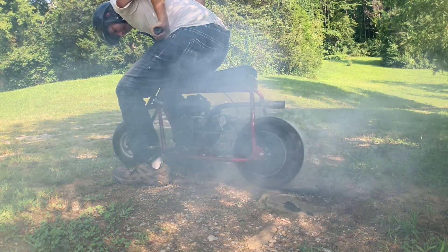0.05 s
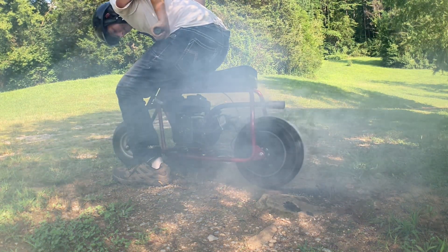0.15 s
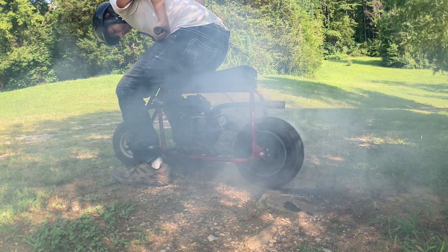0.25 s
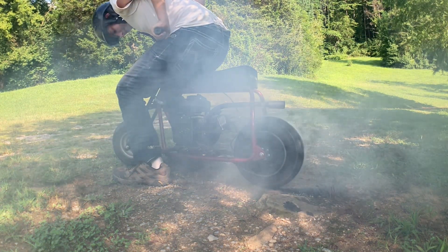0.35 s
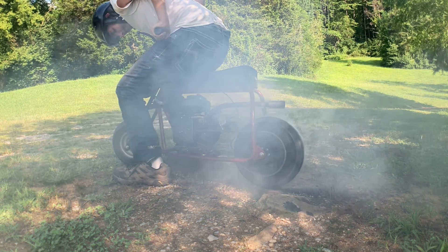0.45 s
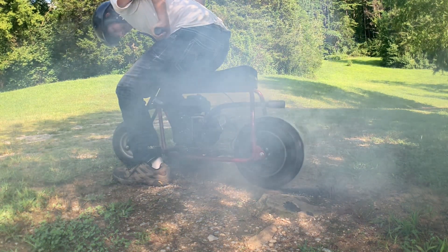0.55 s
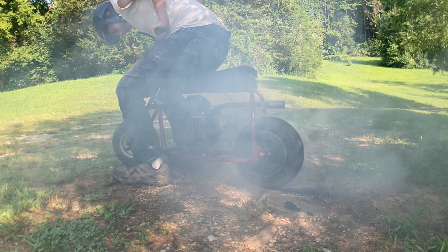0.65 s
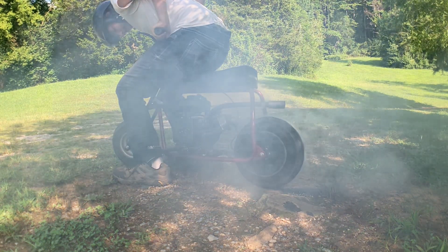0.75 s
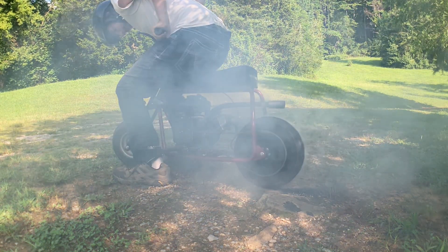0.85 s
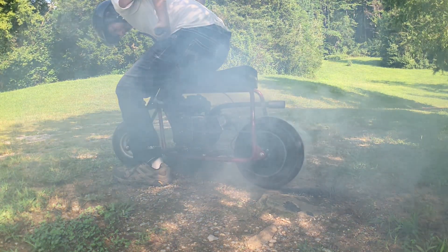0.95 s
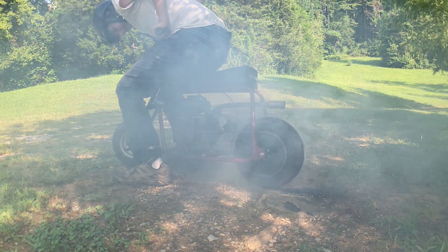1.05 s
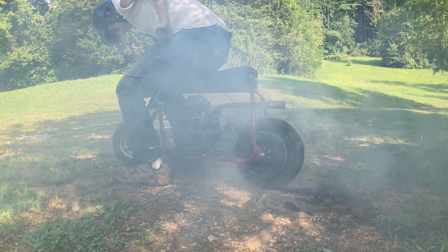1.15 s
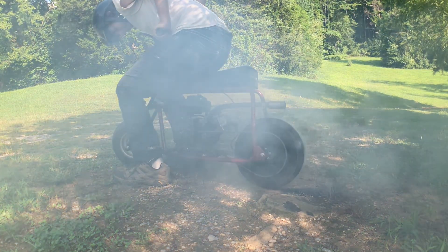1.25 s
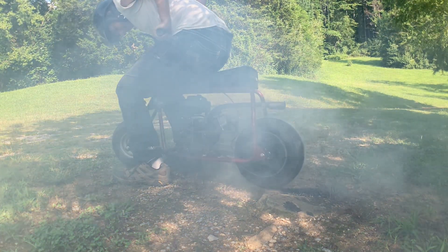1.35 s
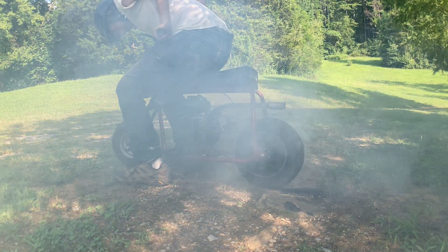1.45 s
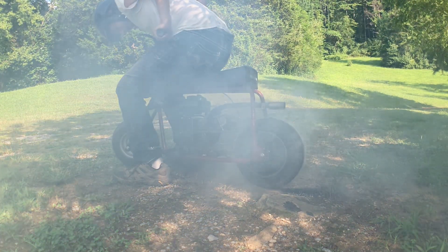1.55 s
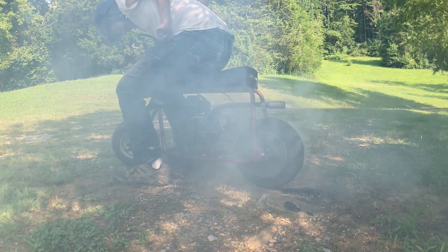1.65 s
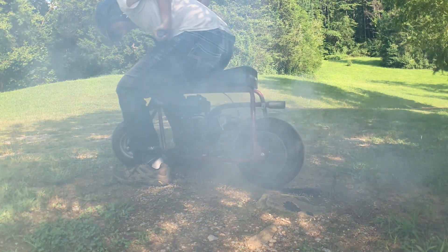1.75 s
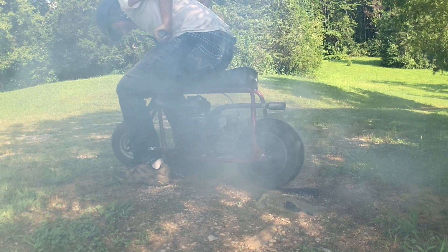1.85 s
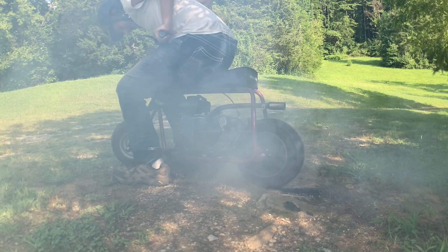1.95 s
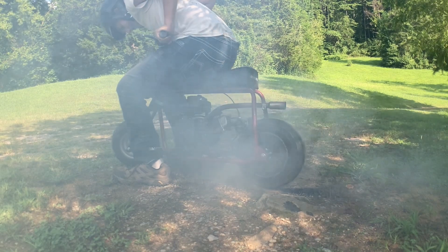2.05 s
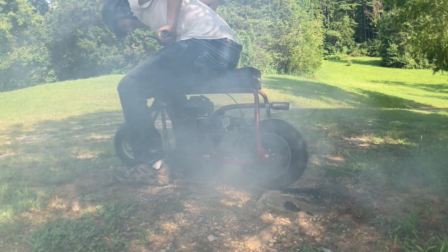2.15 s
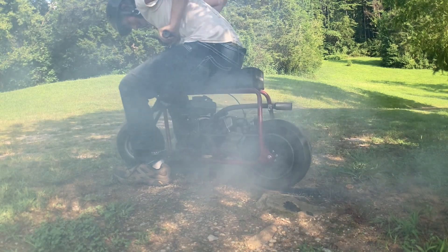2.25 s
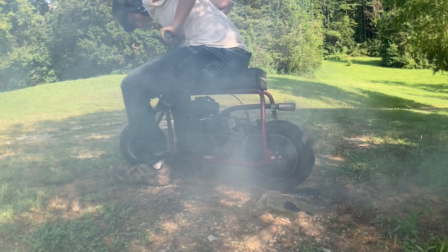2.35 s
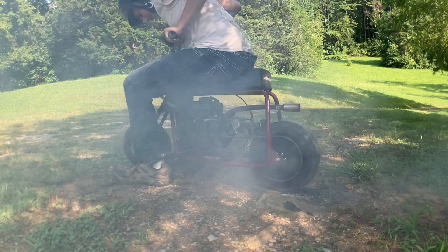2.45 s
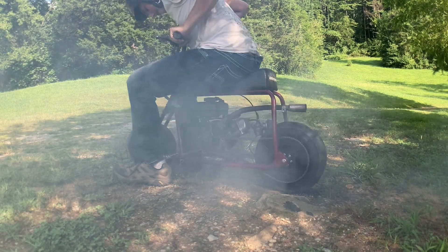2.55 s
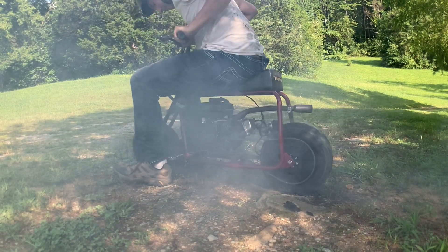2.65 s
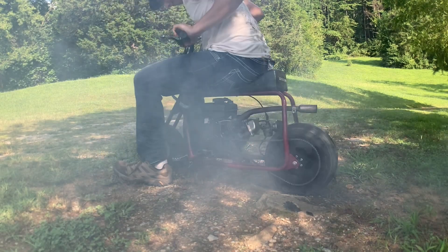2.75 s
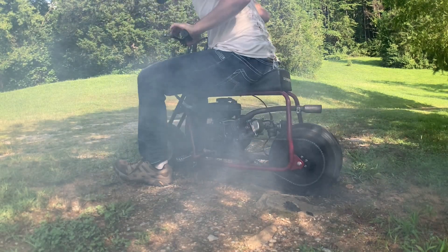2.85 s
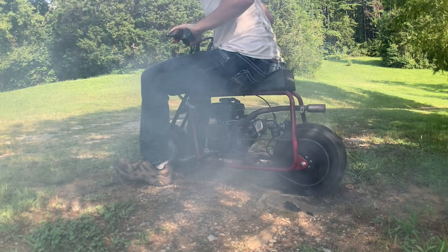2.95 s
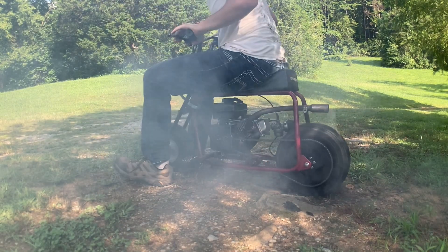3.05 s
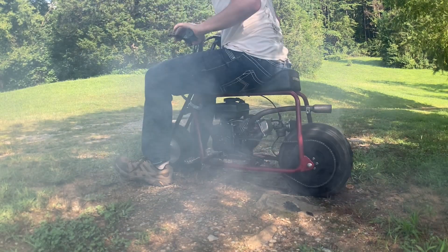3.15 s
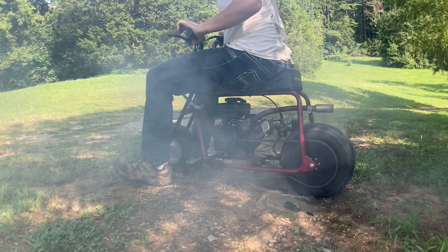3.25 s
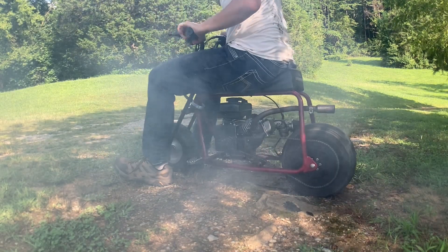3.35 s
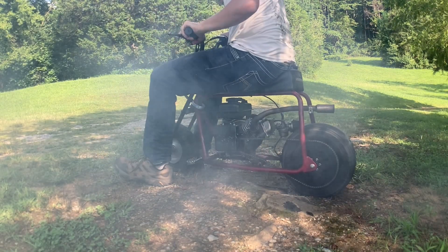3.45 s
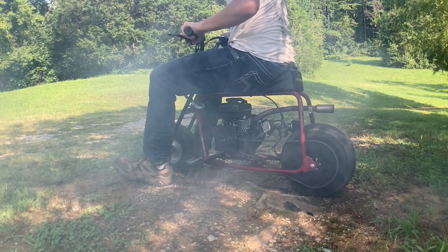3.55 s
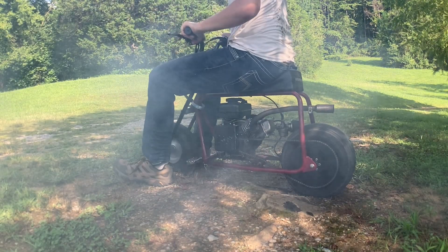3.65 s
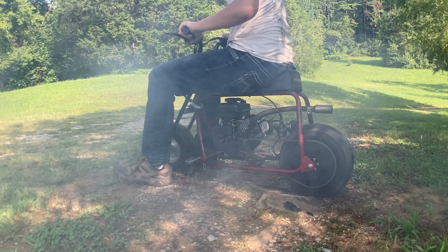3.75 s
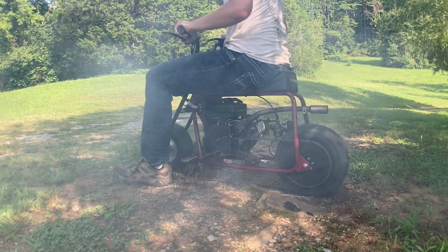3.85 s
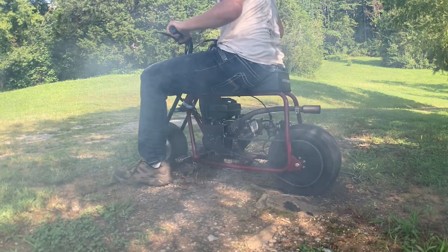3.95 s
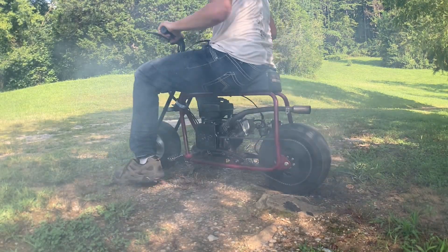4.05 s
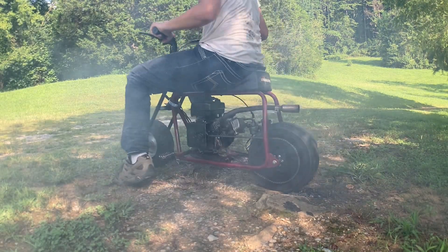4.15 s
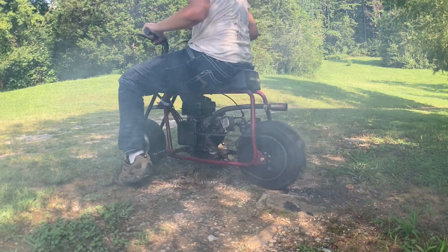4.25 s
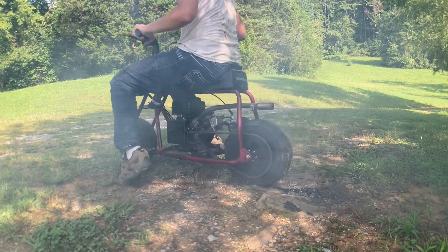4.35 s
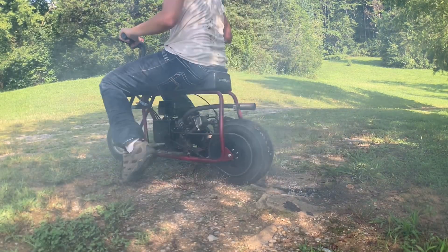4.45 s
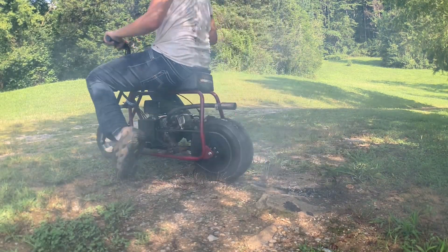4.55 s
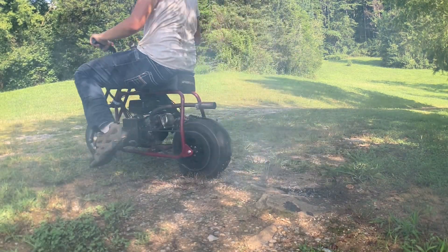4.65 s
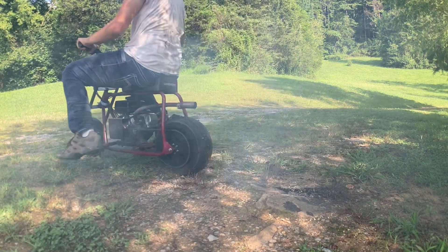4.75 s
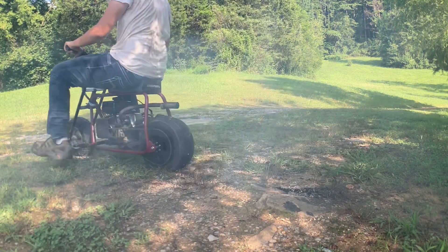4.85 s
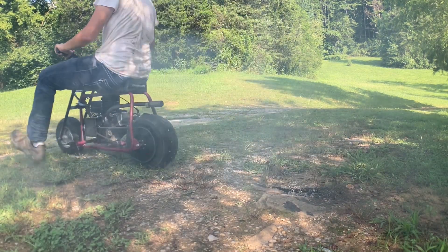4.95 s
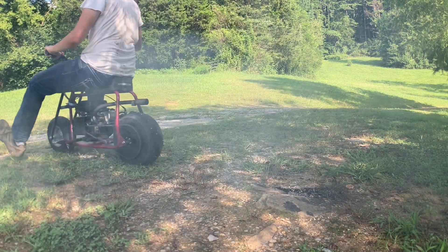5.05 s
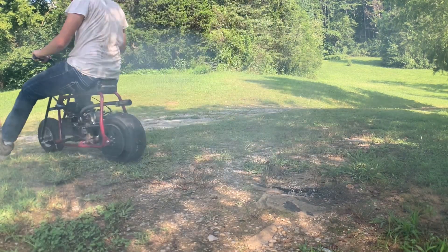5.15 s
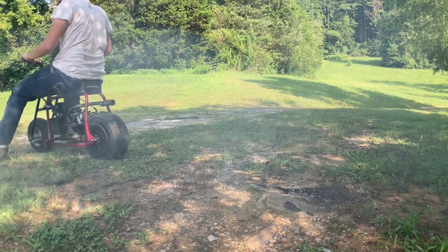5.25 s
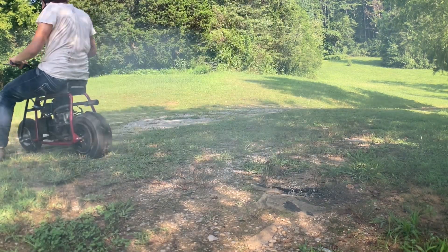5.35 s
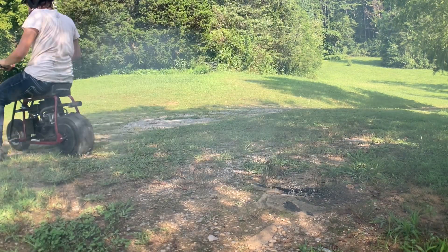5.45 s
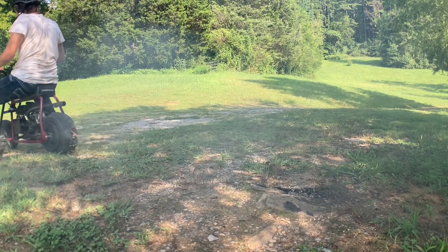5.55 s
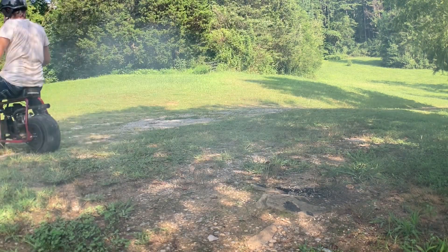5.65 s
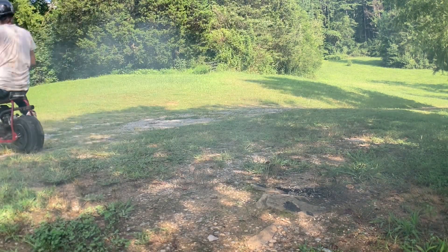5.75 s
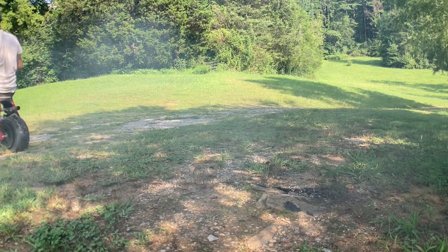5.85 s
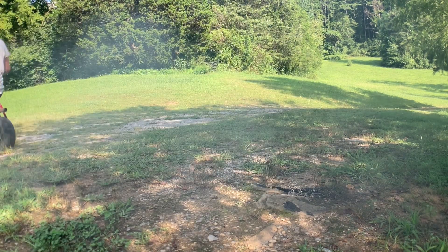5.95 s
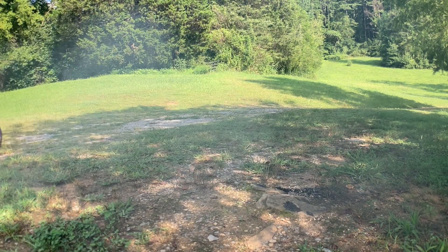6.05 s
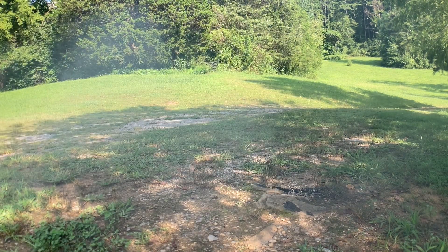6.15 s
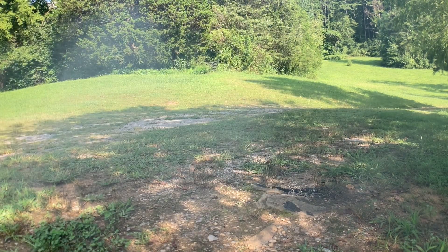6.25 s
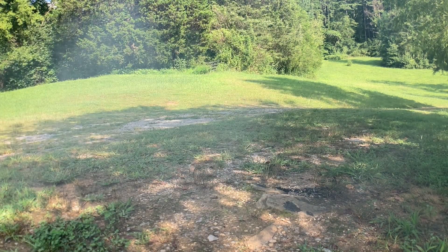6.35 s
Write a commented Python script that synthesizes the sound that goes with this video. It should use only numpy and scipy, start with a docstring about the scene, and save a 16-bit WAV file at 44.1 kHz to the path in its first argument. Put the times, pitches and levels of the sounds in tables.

```python
"""A four-stroke single on a mini bike roars flat out about 2 m from the microphone, its rear tyre spinning in dirt.
The throttle shuts, is blipped, the engine sinks to a lumpy idle and catches again with a few sharp pops.
Then it putters off across a lawn, turning its exhaust towards the listener; a wood echoes faintly.
Pulses timed by the crank ring resonances for exhaust and intake and carry bursts of gas noise; harmonics
make the full-throttle drone, and filtered noise the fan, chain, grit, pops and clutch squeal."""
import sys
import numpy as np
from scipy import signal
from scipy.fft import rfft, irfft
from scipy.io import wavfile
from scipy.ndimage import uniform_filter1d

SR = 44100
rng = np.random.default_rng(int(sys.argv[2]) if len(sys.argv) > 2 else 0)


def inscribe(sig):
    """Save sig as 16-bit PCM at rate SR to the path in sys.argv[1].

    A 1-D sig is mono; a 2-D sig holds one channel per row.
    Samples are clipped to [-1, 1] before scaling.
    """
    pcm = np.round(np.clip(np.atleast_2d(sig).T, -1, 1) * 32767)
    wavfile.write(sys.argv[1], SR, pcm.astype(np.int16))


N = 281790
TIME = np.arange(N) / SR
NEAR_M = 2.05  # distance from the microphone to the bike at its nearest


def undb(db):
    """Decibels to gain."""
    return 10 ** (np.asarray(db) / 20)


def curves(table):
    """Each column of a table of (time [s], ..) rows, sample by sample."""
    s, *columns = np.transpose(table)
    return [np.interp(TIME, s, c) for c in columns]


def unit(x):
    """Scale to rms 1."""
    return x / np.sqrt(np.mean(x ** 2) + 1e-18)


def noise():
    """White noise."""
    return rng.standard_normal(N)


def walk(rate):
    """Random levels, each held 1 / rate seconds, then slewed and scaled to rms 1."""
    hold = int(SR / rate)
    steps = noise()[np.arange(N) // hold]
    return unit(uniform_filter1d(steps, hold))


def ring(x, hz, width_hz):
    """One resonance, gain 1 at its centre."""
    return signal.lfilter(*signal.iirpeak(hz, hz / width_hz, fs=SR), x + 1e-18)


def colour(x, points, size=2048):
    """Minimum-phase filter through (frequency [Hz], level [dB]) points that keeps the power of white noise."""
    hz, db = np.transpose(points)
    bins_hz = np.arange(size // 2 + 1) * SR / size
    log_gain = np.log(undb(np.interp(np.log(bins_hz + 1), np.log(hz), db)))
    # folding the cepstrum onto positive times makes the response causal
    cepstrum = irfft(log_gain)[:size // 2]
    cepstrum[0] = 0
    response = irfft(np.exp(rfft(2 * cepstrum, size)))
    return signal.fftconvolve(x, response / np.linalg.norm(response))[:N]


def strokes(turn, rate, scatter_db):
    """One pulse of uneven size whenever the cycle count passes a whole number; rms near 1."""
    at = np.flatnonzero(np.diff(np.floor(turn)) > 0)
    pulses = np.zeros(N)
    pulses[at] = np.sqrt(SR / rate[at]) * undb(scatter_db * noise()[:len(at)])
    return pulses


def fade(pulses, decay_s):
    """Envelope that carries each pulse's energy in an exponential tail."""
    keep = np.exp(-2 / (decay_s * SR))
    return np.sqrt(signal.lfilter([1 - keep], [1, -keep], pulses ** 2 + 1e-18))


def twist(opens, shuts, opening):
    """The throttle opens, is held and shuts."""
    open_s, shut_s = 0.058, 0.084  # time each movement takes
    opened = np.clip((TIME - opens) / open_s, 0, 1)
    return opening * opened * np.clip(1 - (TIME - shuts) / shut_s, 0, 1)


def throttle():
    """The widest of the twists at each moment, never less than the idle opening."""
    # twists of the grip: (opens [s], shuts [s], opening [0-1])
    twists = [(-.2, .81, 1), (1.278, 1.484, 0.86), (1.448, 1.6, 0.63), (1.59, 1.79, 0.91),
              (2.76, 2.86, 0.69), (3.28, 3.43, 0.86), (3.609, 6.6, 0.86)]
    idle_opening = 0.1
    return np.clip(np.max([twist(*row) for row in twists], axis=0), idle_opening, 1)


def pipe(x):
    """Gas rings the pipe; the lows come out last, so each thump falls in pitch."""
    # resonances that the gas passes one after another: (frequency [Hz], width [Hz])
    pipe_modes = [(77, 26.3), (149, 64.4), (301, 84.7)]
    for hz, width_hz in pipe_modes:
        x = ring(x, hz, width_hz)
    return 2 * ring(x, hz=117, width_hz=87) - x  # all-pass: delays the lows


def thumps(turn, rate):
    """Firing: one blast a cycle through the pipe, and a gulp of the intake that rings the air box."""
    blast = np.roll(strokes(turn, rate, scatter_db=.5), int(0.00082 * SR))
    gulp = strokes(turn - .52, rate, scatter_db=3.0)  # about half a cycle after the blast
    air_box = ring(ring(gulp, hz=258, width_hz=104), hz=339.0, width_hz=52)
    shove = ring(ring(blast, hz=48.4, width_hz=11), hz=62.6, width_hz=50)  # bare push of gas at the outlet
    return undb(49) * pipe(blast) + undb(10.5) * air_box + undb(-1) * shove


def drone(turn):
    """Flat out, the thumps merge into steady harmonics, the low ones lagging."""
    # harmonics at full throttle: (multiple of the cycle rate, relative level [dB])
    harmonics = [(1, -19), (2, 2.5), (3, -15.5), (4, 2), (5, -3.5), (6, -9), (7, 2), (8, -56), (9, -13.5),
                 (10, -8.5), (11, -14), (13, -27.5), (16, -25), (20, -34)]
    tone = np.zeros(N)
    for k, db in harmonics:
        level = undb(db + .5 * walk(14.7))
        tone += level * np.cos(2 * np.pi * (k * turn - 1.106 * np.log(k)))
    return unit(tone)


def can(turn, rate):
    """The silencer can rings briefly in the wake of each blast, a hollow note."""
    lag = 0.3  # share of a cycle after the blast
    return undb(-26.5) * ring(strokes(turn - lag, rate, scatter_db=0.5), hz=863, width_hz=124)


def coasting(turn, rate):
    """Throttle shut: the cylinder sucks as the valve opens, the piston pushes; the valve gear clacks at both."""
    lead = np.interp(rate, [13.5, 19.5, 26], [.29, .19, .02])  # share of a cycle between suck and push
    suck = strokes(turn + lead, rate, scatter_db=.5)
    push = np.roll(strokes(turn, rate, scatter_db=.6), int(.001 * SR))
    low = ring(ring(ring(suck, hz=120, width_hz=62), hz=123, width_hz=177), hz=204, width_hz=380)
    high = ring(ring(ring(push, hz=203.2, width_hz=15.0), hz=145, width_hz=61), hz=170, width_hz=1900)
    shove = ring(ring(suck, hz=66.0, width_hz=17), hz=59.5, width_hz=12)
    air_box = ring(ring(suck + push, hz=450, width_hz=54), hz=415, width_hz=48)
    gas = undb(28.0) * low + undb(30.5) * high + undb(24.5) * shove + undb(11.5) * air_box
    soft = signal.sosfilt(signal.butter(4, 520, fs=SR, output="sos"), gas)
    knocks = fade(suck + push, decay_s=0.014) * noise()
    clack = unit(ring(ring(knocks, hz=2530, width_hz=660), hz=2460, width_hz=910))
    return soft + undb(-19.5) * clack


def spits(pulses, memory, order=440):
    """A few ms of turbulent gas after each pulse; its shape is partly carried over from cycle to cycle."""
    at = np.flatnonzero(pulses)
    shapes = rng.standard_normal((len(at), order))
    keep = np.clip(memory, 0, .99)
    for k in range(1, len(at)):
        shapes[k] = keep * shapes[k - 1] + np.sqrt(1 - keep ** 2) * shapes[k]
    t = TIME[:order]
    envelope = (1 - np.exp(-t / 0.00046)) * np.exp(-t / 0.0032)
    out = np.zeros(N + order)
    out[at[:, None] + np.arange(order)] = pulses[at, None] * shapes * envelope / np.linalg.norm(envelope)
    return out[:N]


def cracks(turn, rate, crack_db):
    """Each blast starts with a steep front and a spit of gas, coloured by where the pipe points."""
    # view of the bike: (time [s], heading [0 side, 1 turning, 2 behind])
    headings = [(4.3, 0.15), (4.85, 0.94), (5.35, 1.21), (5.85, 1.6)]
    # exhaust crack from the side, while turning and from behind: (frequency [Hz], level [dB])
    side = [(200, -1), (500, -20.5), (900, -28), (1400, 4.5), (2000, 1.5), (2400, -9.5), (3700, -19.5),
            (4900, 3), (6200, -10), (7600, -8.5), (9500, -18.5), (12000, -7.5), (16000, -22)]
    turning = [(200, -17), (500, -10.5), (1000, -15.5), (1450, 2), (1900, -7), (2450, -5), (3200, -8.5),
               (4100, -2.5), (4700, -9), (5600, 5.5), (6700, -6.5), (8000, 3.5), (9500, -18), (11700, -6),
               (16000, -16)]
    behind = [(200, -37), (500, -7), (880, 4.5), (1450, -8.5), (2000, -12), (2450, 3), (3000, -1),
              (4300, -15), (5700, -2.5), (7500, -6), (8500, -22), (16000, -16)]
    # strength of the crack in those three views: (level [dB])
    view_db = [-2, 3, 3.5]
    # modes of the exhaust's thin steel: (frequency [Hz], width [Hz], level [dB])
    steel_modes = [(1468, 89, -2), (4630, 53, 2.5), (4930, 41, 7), (5620, 37, 15.5), (7470, 210, -11)]

    pulses = strokes(turn, rate, scatter_db=1.7) * undb(crack_db)
    front = pulses + .5 * np.roll(pulses, int(.0017 * SR))  # and its bounce inside the pipe
    gas = undb(-2.5) * front + undb(-3) * spits(pulses, memory=.6)
    gas = np.roll(gas, int(.0004 * SR))
    heading, = curves(headings)
    bark = np.zeros(N)
    for k, view in enumerate((side, turning, behind)):
        share = np.clip(1 - abs(heading - k), 0, 1)
        bark += share * undb(view_db[k]) * colour(gas, view)
    # the gas also rings the steel, which fades out as the bike turns from its side
    steel = sum(undb(db) * ring(gas, hz, width_hz) for hz, width_hz, db in steel_modes)
    return bark + undb(3) * np.clip(1 - heading, 0, 1) * steel


def pops():
    """Unburnt fuel goes off in the pipe: sharp bangs, each with a hissing tail."""
    # bangs: (time [s], relative level [dB])
    bangs = [(2.7568, -10), (2.818, -4.5), (2.8683, -6.5), (3.2968, -12), (3.3508, -0.5), (3.689, -6.5)]
    # their colour: (frequency [Hz], level [dB])
    bang_colour = [(300, -18), (900, -7), (1600, 1), (3000, 0.5), (5500, 6), (8500, 6.5), (12000, 2),
                   (16000, 2.5)]
    pulses = np.zeros(N)
    for s, db in bangs:
        pulses[int(s * SR)] = undb(db)
    envelope = undb(15.5) * fade(pulses, decay_s=0.0076) + undb(6) * fade(pulses, decay_s=0.069)
    return colour(envelope * noise(), bang_colour)


def flicker(x, patchy_db, size=512):
    """The hiss flickers in patches a few hundred hertz wide and some tens of ms long."""
    bands = signal.stft(x, nperseg=size)[2]
    patches = rng.standard_normal(bands.shape)
    patches = uniform_filter1d(patches, size=5, axis=0)  # across frequency
    patches = uniform_filter1d(patches, size=7, axis=1)  # along time
    patchy = signal.istft(bands * undb(patchy_db * unit(patches)), nperseg=size)[1][:N]
    return unit(patchy) * np.std(x)


def rush(turn, rate, roar):
    """Fan hiss that swells once a cycle, with chain rattle and thrown grit; duller at low revs."""
    # colour of fan, chain and tyre: (frequency [Hz], level [dB])
    rush_colour = [(150, -20.5), (450, 7), (650, -11), (900, -8), (1300, -6.5), (1900, -8.5), (2800, -1.5),
                   (4200, -4), (5500, 0), (7500, 0.5), (10000, -3), (16000, -6)]
    swell_db = 1.0 * np.cos(2 * np.pi * (turn - .15)) + 0.62 * walk(40)
    ticks = (rng.random(N) < 260 / SR) * undb(4 * noise())  # about 260 a second
    grit = unit(fade(ticks, decay_s=.0012) * noise())
    air = undb(-1.5) * noise() + undb(-7 - 3 * roar) * grit
    # moving parts clatter the same way on every cycle, which draws harmonics at high revs
    clatter = unit(np.interp(turn % 1, np.linspace(0, 1, 110), noise()[:110]))
    hiss = colour(flicker(air, patchy_db=2.5) + undb(-12.0) * roar * clatter, rush_colour)
    dull = signal.sosfilt(signal.butter(1, 3800, fs=SR, output="sos"), hiss)
    bright = np.clip((rate - 14) / 7, 0, 1)
    return (dull + bright * (hiss - dull)) * undb(swell_db)


def clutch():
    """The slipping clutch sings: its shoes rub the drum in short swells and ring its modes."""
    # swells: (middle [s], length [s], level [dB])
    squeals = [(2.039, 0.12, -44), (2.97, 0.4, -52), (3.6, 0.21, -60)]
    # modes of the drum: (frequency [Hz], width [Hz], level [dB])
    drum_modes = [(5720, 320, 12), (8250, 450, 5.8), (11350, 510, 7.3)]
    rub = sum(undb(db) * np.exp(-(2 * (TIME - s) / length) ** 2 * 2) for s, length, db in squeals)
    chatter = undb(3 * walk(120))
    song = sum(undb(db) * unit(ring(ring(noise(), hz, width), hz, width)) for hz, width, db in drum_modes)
    return rub * chatter * song


def distance():
    """Metres to the bike as it pulls away from a standstill, at first across the line of sight."""
    leaves_s, accel_m_s2 = 4.23, 2.26
    travelled = accel_m_s2 * np.maximum(TIME - leaves_s, 0) ** 2 / 2
    return np.hypot(NEAR_M, travelled)


def trees(x, t60_s, echo_db):
    """A faint scattered echo from the edge of the wood."""
    t = TIME[:SR]
    tail = noise()[:SR] * undb(-60 * t / t60_s) * np.clip(t / 0.034, 0, 1)
    return undb(echo_db) * signal.fftconvolve(x, tail / np.linalg.norm(tail))[:N]


def scene():
    """The crank drives the engine layers; the throttle blends coasting and firing; speed and load set levels."""
    # engine speed: (time [s], engine cycles per second [Hz])
    speeds = [(0.0, 47.96), (0.79, 49.27), (1.32, 24.22), (1.45, 26.3), (1.6, 23.38), (1.79, 23.16),
              (1.84, 19.94), (2.34, 13.7), (2.66, 13.07), (2.78, 19.33), (3.23, 17.82), (3.33, 21.61),
              (3.56, 19.82), (3.8, 23.39), (4.11, 24.01), (4.42, 23.65), (5.28, 23.66), (6.39, 22.77)]
    # cycles that fire harder than their neighbours: (time [s], extra crack [dB])
    hard_firings = [(4.662, 0), (4.833, 1.5), (4.917, 2.5), (5.086, 3.5), (5.256, 5), (5.383, 3.5),
                    (5.596, 0.5), (6.026, 2)]
    cruise_hz = 24  # cycle rate at which the base levels below hold
    merge_hz, merged_hz = 27.6, 39  # cycle rates between which the thumps merge into a drone
    grip_s, gripping_s = 2.28, 0.2  # the spinning tyre has its grip by then, and the time that takes
    aim_s, aim_width_s = 5.05, 0.58  # the pipe swings past the listener

    rate, = curves(speeds)
    turn = .18 + np.cumsum(rate) / SR  # engine cycles so far
    octaves = np.log2(rate / cruise_hz)
    firing = throttle()
    shut = 1 - firing
    roar = firing * np.clip((rate - merge_hz) / (merged_hz - merge_hz), 0, 1)
    spin = np.clip((grip_s - TIME) / gripping_s, 0, 1)
    aim = np.exp(-((TIME - aim_s) / aim_width_s) ** 2 / 2)
    hard_db = sum(db * (abs(TIME - s) < .5 / cruise_hz) for s, db in hard_firings)

    coast = undb(-24.5 + 7 * octaves) * shut * coasting(turn, rate)
    thump = (firing - roar) * (undb(-16) * thumps(turn, rate) + can(turn, rate))
    exhaust = coast + thump + undb(-10.5) * roar * drone(turn)
    # with the bike's own swell below, the aim lifts the crack most and the rush only a little
    crack_db = -25.5 + 2 * octaves - 28.5 * shut + 2 * aim + hard_db
    rush_db = -25.5 + 7 * octaves - 6 * shut + 2.5 * spin - 0.5 * aim
    treble = cracks(turn, rate, crack_db) + undb(rush_db) * rush(turn, rate, roar) + pops()
    # the whole bike swells with the aim and fades with distance
    bike = (exhaust + treble + clutch()) * undb(1.65 * aim) * NEAR_M / distance()
    echo = trees(bike, t60_s=.4, echo_db=-17)
    return (bike + echo)[None]


def record(dry):
    """The phone's microphone drops the deepest bass, rounds the highest peaks and cuts the top."""
    bass_cut = signal.butter(4, 36, "high", fs=SR, output="sos")
    lean = signal.sosfiltfilt(bass_cut, dry, padtype="even", padlen=4096)
    rounded = lean / (1 + (lean / .76) ** 8) ** (1 / 8)
    top_cut = signal.ellip(10, .2, 80, 15900, fs=SR, output="sos")
    return signal.sosfilt(top_cut, rounded)


dry = scene()
out = record(dry)
inscribe(out)
```